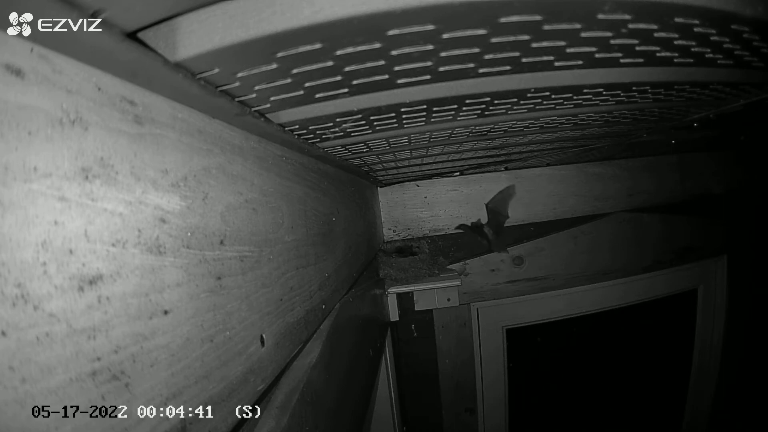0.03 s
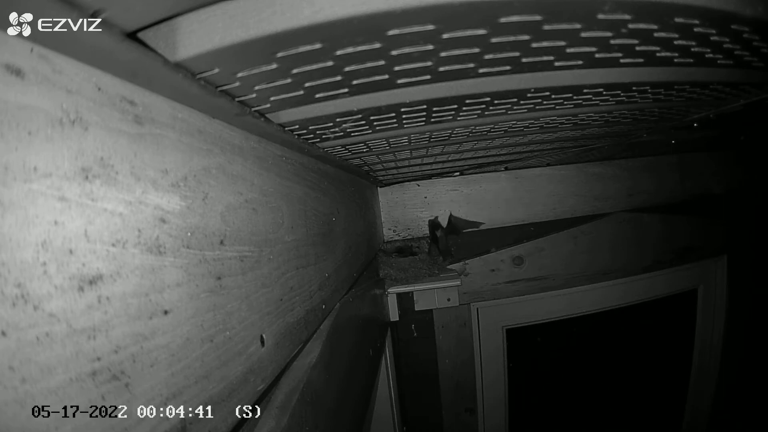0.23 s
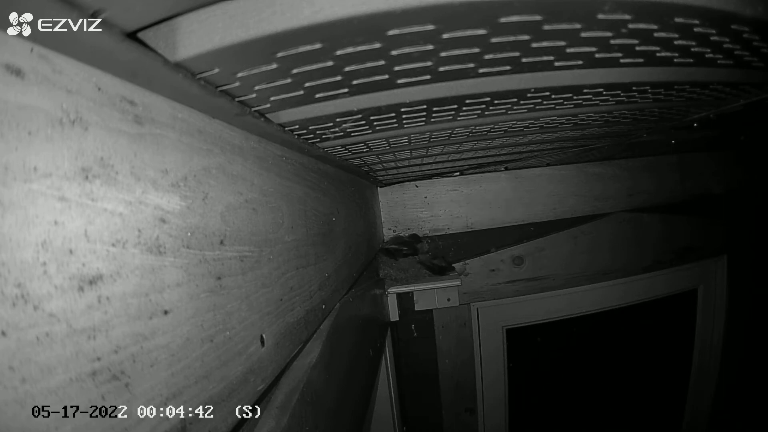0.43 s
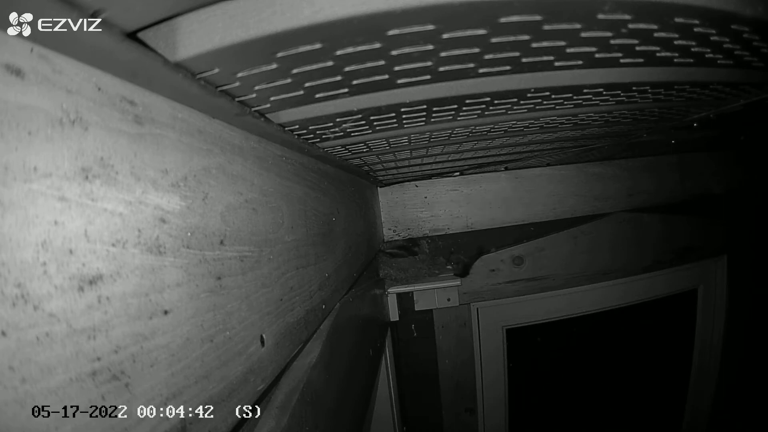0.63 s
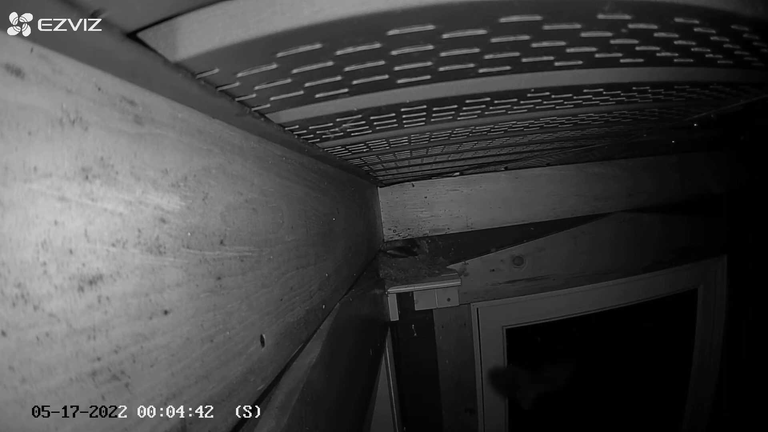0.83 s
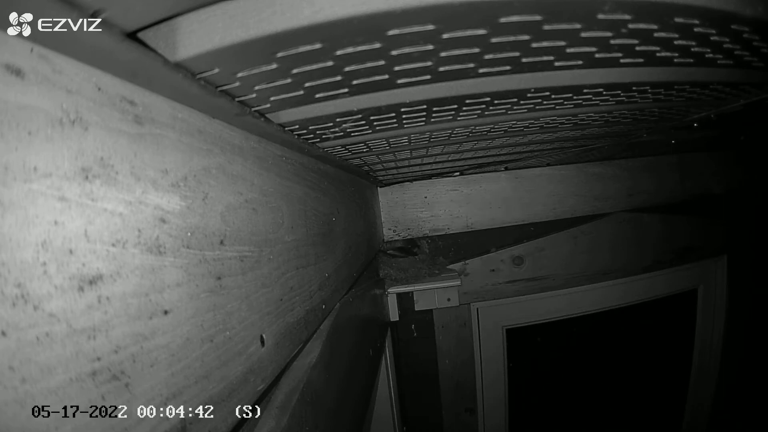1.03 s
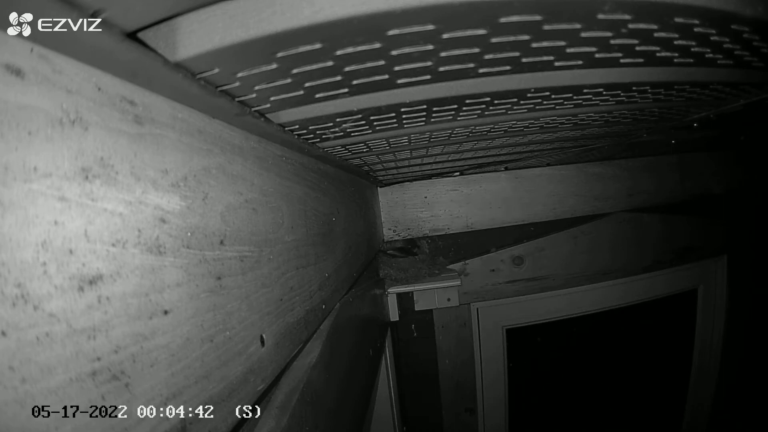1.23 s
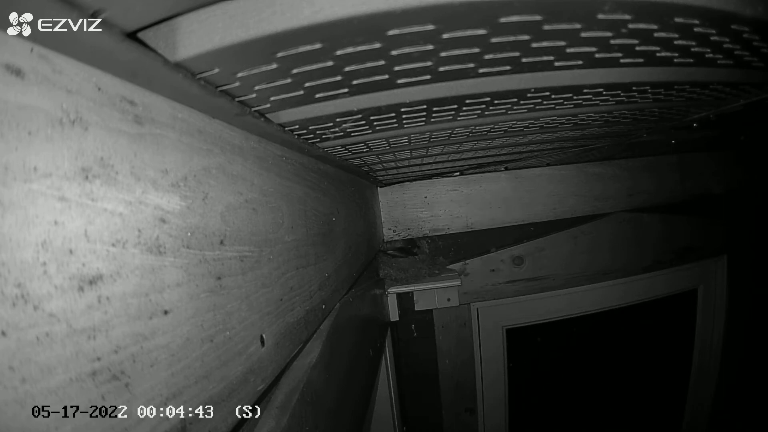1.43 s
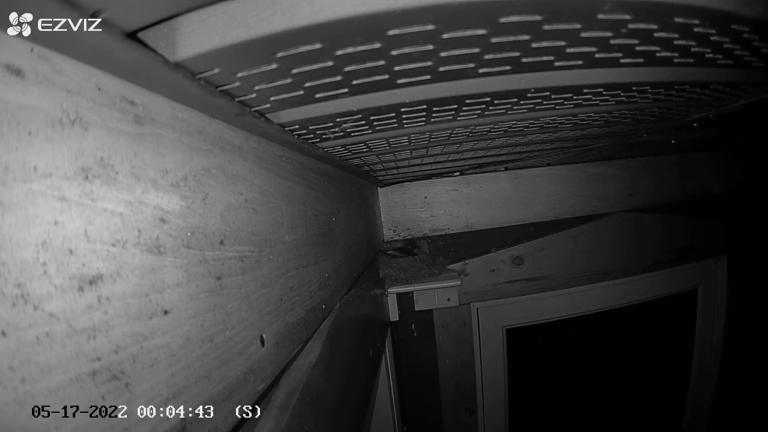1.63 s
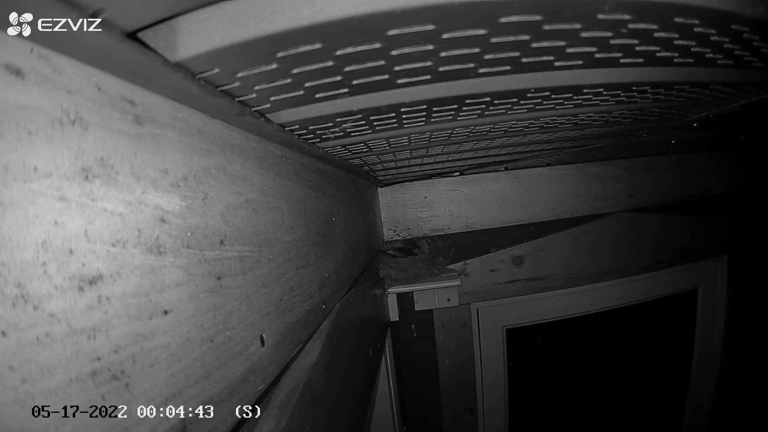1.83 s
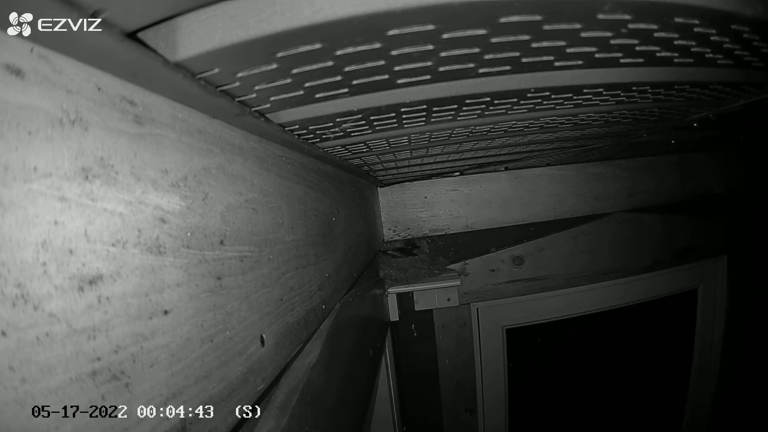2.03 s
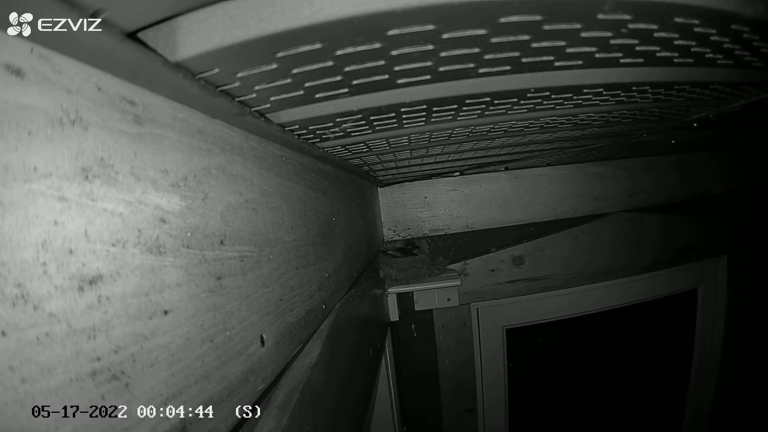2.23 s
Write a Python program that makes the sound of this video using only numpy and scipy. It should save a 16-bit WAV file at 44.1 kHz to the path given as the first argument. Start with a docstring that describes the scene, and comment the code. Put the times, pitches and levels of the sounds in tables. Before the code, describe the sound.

Dull, irregular wing flaps of a small bat lightly brushing and ticking against a wooden wall.

```python
"""Wings in a wooden corner

A small animal flutters close by at night. Its wings displace air in uneven flurries of dull puffs,
over a low stir of eddies. Friction sounds as it brushes and scratches the wall; impacts give ticks
and light taps. After two seconds it settles, and only a faint low hum and hiss remain."""
import sys
import numpy as np
from scipy import signal
from scipy.fft import rfft, irfft, next_fast_len
from scipy.io import wavfile

SR = 44100
rng = np.random.default_rng(int(sys.argv[2]) if len(sys.argv) > 2 else 0)


def file_out(sig):
    """Save sig as 16-bit WAV at sys.argv[1]."""
    # one column per channel
    cols = np.atleast_2d(sig).T
    # limit, then scale
    lim = np.clip(cols, -1, 1)
    pcm = np.round(lim * 32767).astype(np.int16)
    wavfile.write(sys.argv[1], SR, pcm)


N = 101429
T = np.arange(N) / SR

# Spectra of the noises. Each row: frequency in Hz, relative level in dB.
NIGHT_SPECTRUM = [(25, 1), (170, -1), (350, -13), (600, -16), (1000, -19), (2000, -21.5), (7000, -29.5)]
EDDY_SPECTRUM = [(30, -24), (60, -12.5), (110, 7), (180, 3), (260, 3), (350, -16), (450, -44), (700, -71)]
RUSTLE_SPECTRUM = [(180, -11), (300, 7.5), (420, 1.5), (560, -15.5), (750, -22.5), (1000, -39),
                   (1450, -48.5), (1900, -72.5)]
DRAUGHT_SPECTRUM = [(15, -11), (30, -11.5), (50, -0.5), (75, -2), (110, 0), (200, -31.5), (500, -85)]
WAKE_SPECTRUM = [(150, -17.5), (280, 6.5), (380, 7), (500, -11.5), (650, -25.5), (850, -45), (1300, -81.5)]
HISS_SPECTRUM = [(700, 7), (1400, -1.5), (2300, -11), (3600, -1.5), (5200, 2), (6400, 0), (7200, -20.5),
                 (7800, -39.5)]
CRACK_SPECTRUM = [(400, -22.5), (800, -5.5), (1400, -7), (2100, -16), (3000, -4), (3900, 4), (5200, 7),
                  (6200, 0.5), (7000, -22), (8300, -38.5)]
TAP_SPECTRUM = [(600, -0.5), (1100, 12), (2200, -5.5), (2700, -19.5), (4200, -29), (5200, -6), (6200, -11),
                (7000, -31.5)]

# Envelopes of the sustained noises. Each row: time in seconds, relative level in dB.
EDDY_LEVELS = [(0, -54.5), (.1, -48), (.3, -37), (.5, -36.5), (.7, -46.5), (.78, -45.5), (.9, -38),
               (.975, -41), (1.1, -39.5), (1.22, -36.5), (1.4, -43.5), (1.52, -43), (1.58, -56.5),
               (1.68, -55.5), (1.8, -37), (1.92, -44), (1.97, -57), (2.07, -68), (2.11, -95), (2.3, -103)]
RUSTLE_LEVELS = [(0, -100.5), (.14, -89), (.21, -71), (.28, -53), (.41, -47.5), (.47, -43), (.58, -54.5),
                 (.7, -42.5), (.84, -46), (.975, -48.5), (1.05, -33), (1.16, -57.5), (1.28, -52.5),
                 (1.52, -46.5), (1.58, -62.5), (1.72, -59.5), (1.9, -60.5), (2.0, -66), (2.1, -96.5)]
DRAUGHT_LEVELS = [(0.0, -39.5), (0.15, -35.5), (0.18, -46.5), (0.45, -36.5), (0.47, -49), (0.68, -36.5),
                  (0.86, -56), (0.9, -34), (0.975, -61), (1.015, -31), (1.12, -46), (1.2, -30), (1.64, -67),
                  (1.71, -53), (1.75, -41), (1.82, -36.5), (2.09, -84.5), (2.3, -85)]
HISS_LEVELS = [(.38, -130), (.412, -64), (.465, -57), (.49, -50), (.525, -62), (.545, -53), (.585, -69),
               (.635, -69), (.68, -130)]

# Puffs of air. Each row: time in seconds, envelope peak in dB, pitch in Hz, bandwidth in octaves.
WING_FLAPS = [(0.0395, -27.5, 156.3, 0.49), (0.0478, -30, 181.6, 0.36), (0.073, -33.5, 173, 0.38),
              (0.1242, -29, 146.8, 0.15), (0.1391, -26.5, 92.2, 0.4), (0.168, -20.5, 128.4, 0.4),
              (0.2076, -22.5, 152.6, 0.46), (0.2115, -21.5, 237, 0.27), (0.226, -26.5, 96, 0.91),
              (0.2609, -23, 156.8, 0.26), (0.265, -18.5, 140, 0.56), (0.277, -19.5, 139, 0.33),
              (0.2961, -25.5, 124.5, 0.3), (0.3135, -20, 223, 0.27), (0.3342, -7.5, 176.7, 0.66),
              (0.3539, -15, 183.4, 0.4), (0.3667, -8.5, 163.4, 0.72), (0.3951, -27.5, 107, 0.19),
              (0.4071, -31, 161, 0.2), (0.4306, -9, 184.4, 0.37), (0.4425, -15.5, 170, 0.74),
              (0.45, -13.5, 218, 0.53), (0.459, -25, 145, 0.86), (0.4981, -28, 205, 0.21),
              (0.5122, -24, 138, 0.7), (0.523, -25, 175, 0.27), (0.5385, -24, 157, 0.82),
              (0.5633, -26, 152, 0.48), (0.5752, -16.5, 213, 0.37), (0.5903, -27.5, 161, 0.68),
              (0.6162, -14, 229, 0.5), (0.638, -27, 132, 0.73), (0.6532, -16, 169.5, 0.58),
              (0.6687, -20.5, 153, 0.42), (0.6832, -22, 104.2, 1.1), (0.6911, -24.5, 185, 0.41),
              (0.7003, -19.0, 152, 0.56), (0.71, -21, 183.6, 0.38), (0.7174, -22, 110, 1.03),
              (0.7319, -13.5, 217, 0.75), (0.743, -30.5, 141.3, 0.16), (0.7625, -13.5, 144.7, 0.98),
              (0.8072, -13, 211.7, 0.42), (0.8231, -15, 241, 0.89), (0.83, -21.5, 148.5, 0.27),
              (0.8504, -14.5, 146.4, 0.62), (0.8684, -11, 236.4, 0.34), (0.8783, -13, 159.3, 0.9),
              (0.889, -23.5, 122, 0.4), (0.8992, -28, 287, 0.17), (0.911, -11.5, 168, 0.6),
              (0.9205, -14, 207, 0.61), (0.9284, -16.5, 225, 0.3), (0.9397, -23, 154, 0.29),
              (0.9515, -19.5, 209, 0.46), (0.9921, -20.5, 185.4, 0.28), (1.0182, -12, 309, 0.51),
              (1.0257, -10, 161, 0.76), (1.0513, -18.5, 186, 0.62), (1.0697, -11.5, 227.3, 0.59),
              (1.08, -21.5, 137, 0.21), (1.1429, -21.5, 141.5, 0.93), (1.1648, -26, 135, 0.21),
              (1.177, -16, 238, 0.23), (1.1843, -21, 163, 0.31), (1.1989, -8.5, 174, 0.65),
              (1.2105, -7, 169.3, 0.71), (1.2216, -9.5, 220.3, 0.2), (1.255, -10.5, 181.6, 0.54),
              (1.2791, -23, 157, 0.11), (1.2966, -13.0, 255, 0.6), (1.303, -21, 120, 1.02),
              (1.3118, -14.5, 208, 0.59), (1.3252, -23.5, 290, 0.288), (1.3397, -27, 191, 0.95),
              (1.3585, -17.5, 130.3, 0.59), (1.3675, -16.5, 193, 0.72), (1.3899, -11, 195.6, 0.67),
              (1.4032, -16.0, 147, 0.68), (1.43, -21, 238.5, 0.31), (1.4602, -14.5, 173.7, 1.04),
              (1.472, -16, 208.4, 0.4), (1.4881, -13.5, 168.7, 0.72), (1.4972, -21.5, 245, 0.38),
              (1.5069, -18, 154.4, 0.46), (1.518, -16, 150.7, 0.69), (1.5732, -26, 148, 0.69),
              (1.6277, -29, 174, 0.19), (1.6304, -30, 297.3, 0.27), (1.6431, -21.0, 156, 0.65),
              (1.6548, -25, 234.6, 0.36), (1.7001, -23.5, 141, 0.36), (1.7117, -21.5, 132, 0.83),
              (1.7261, -30.5, 259.5, 0.38), (1.7561, -23, 258, 0.44), (1.7627, -26, 139.7, 0.45),
              (1.7898, -24.0, 237, 0.29), (1.8263, -19, 160.7, 0.59), (1.8402, -13.0, 262.6, 0.32),
              (1.8741, -24.5, 211, 0.5), (1.886, -17.5, 201, 0.53), (1.9088, -17, 187, 0.61),
              (1.9253, -21.5, 166.3, 0.46), (1.9817, -29.0, 199.6, 0.39)]
# Claws sliding on wood.
# Each row: time in seconds, level in dB, half-width in seconds, centre in Hz, bandwidth in octaves.
CLAW_SCRATCHES = [(.33, -67.5, .04, 863.4, .15), (.358, -77.5, 0.02, 5880, .06),
                  (0.547, -51, .008, 5560, 0.15), (0.735, -61.5, .008, 1400, 0.3),
                  (0.843, -66, .022, 5780, 0.13), (0.848, -62, .022, 1296, .35),
                  (0.909, -71, 0.14, 1154, 0.23), (1.001, -49, 0.0056, 1110, 0.2),
                  (1.01, -62, .005, 1247, 0.16), (1, -84.5, 0.006, 5660, 0.076)]
# Wings on wood. Each row: time in seconds, level in dB, half-width in seconds, upper edge in Hz.
WING_BRUSHES = [(0.448, -43, 0.0024, 620), (0.46, -50, 0.0021, 619), (0.495, -41, 0.0023, 679),
                (0.729, -36.5, 0.003, 745), (0.735, -44.5, 0.0033, 793), (0.785, -55, 0.01, 880),
                (0.81, -38, 0.0046, 790), (0.82, -40, .004, 650), (0.864, -31, 0.003, 607),
                (1.022, -39.5, 0.0047, 544), (1.085, -55, .004, 650), (1.217, -43, 0.0092, 800),
                (1.257, -39.5, 0.0083, 634), (1.319, -35, 0.003, 568), (1.365, -39.5, 0.0038, 688),
                (1.47, -41, 0.0051, 598.4), (1.629, -43.5, 0.0031, 440), (1.767, -52.5, 0.0088, 523),
                (1.912, -52.5, .003, 520)]
# Hard impacts. Each row: start in seconds, crack level in dB, knock drive in dB, crack decay in seconds.
WALL_TICKS = [(0.474, -27, -31.5, 0.00058), (0.5361, -26.5, -32, 0.0015)]
# Modes of the wall. Each row: frequency in Hz, level in dB relative to the drive, decay in seconds.
WOOD_MODES = [(850, -0.5, 0.0013), (1350, -11.5, 0.0021)]
# Light impacts of claws. Each row: time in seconds, level in dB.
CLAW_TAPS = [(0.8366, -43.5), (0.8443, -46.5), (.851, -52.5), (.856, -55.5)]


def from_db(db):
    """Amplitude ratio for a level in decibels."""
    return 10 ** (np.asarray(db) / 20)


def level(curve):
    """Gain over time, interpolated in decibels."""
    return from_db(np.interp(T, *np.transpose(curve)))


def shaped_noise(gain_at):
    """White noise filtered by a function of frequency and scaled to unit rms."""
    size = next_fast_len(N, True)
    hz = np.maximum(np.fft.rfftfreq(size, 1 / SR), 1)
    white = rfft(rng.standard_normal(size))
    shaped = irfft(white * gain_at(hz), size)[:N]
    return shaped / shaped.std()


def noise(spectrum):
    """Noise of unit rms with a tabulated spectrum, interpolated in log frequency."""
    points_hz, db = np.transpose(spectrum)
    return shaped_noise(lambda hz: from_db(np.interp(np.log(hz), np.log(points_hz), db)))


def slope(ratio, order):
    """Gain of a filter edge: flat below a ratio of 1, falling beyond."""
    return 1 / np.sqrt(1 + ratio ** (2 * order))


def band(hz, centre_hz, octaves):
    """Gain of a pass band, bell-shaped in log frequency."""
    return np.exp(-.5 * (np.log2(hz / centre_hz) / octaves) ** 2)


def swell(time, half_width):
    """A smooth envelope, symmetric about its peak at the given time."""
    return 1 / (1 + ((T - time) / half_width) ** 2 / 2) ** 2


def burst(envelope, carrier):
    """Amplitude-modulated noise, scaled to carry the energy of its envelope."""
    pulse = envelope * carrier
    return pulse * np.sqrt(np.sum(envelope ** 2) / np.sum(pulse ** 2))


def night_background():
    """Stationary noise weighted to the bass is heard as a faint hum and hiss."""
    return from_db(-91.5) * noise(NIGHT_SPECTRUM)


def stirred_air(flicker_db=5.5, flicker_hz=35):
    """Turbulence makes eddies and membrane rustle flicker, above the deep draught of the wings."""
    eddies = level(EDDY_LEVELS) * noise(EDDY_SPECTRUM)
    rustle = level(RUSTLE_LEVELS) * noise(RUSTLE_SPECTRUM)
    flicker = from_db(flicker_db * shaped_noise(lambda hz: slope(hz / flicker_hz, order=4)))
    draught = from_db(-5.5) * level(DRAUGHT_LEVELS) * noise(DRAUGHT_SPECTRUM)
    return flicker * (eddies + rustle) + draught


def wing_flaps(top_hz=596, wake_exponent=1.405):
    """A flap displaces air in one smooth push and pull, and sheds a turbulent wake."""
    size = next_fast_len(N + SR // 2)
    hz = np.maximum(np.fft.rfftfreq(size, 1 / SR), 1)
    hz = hz[hz < SR / 20]
    spectrum = np.zeros(len(hz), complex)
    for time, db, pitch_hz, octaves in WING_FLAPS:
        puff = band(hz, pitch_hz, octaves) * slope(hz / top_hz, order=4)  # a wide band is abrupt
        delay = np.exp(-2j * np.pi * hz * time)
        spectrum += from_db(db) * puff / puff.sum() * delay
    puffs = size * np.fft.ifft(spectrum, size)[:N]  # analytic signal: its magnitude is the envelope
    wake_envelope = np.abs(puffs) ** wake_exponent  # the wake grows faster than the flap that sheds it
    return puffs.imag + from_db(-23.5) * wake_envelope * noise(WAKE_SPECTRUM)


def claw_scratches():
    """Friction of claws gives swells of band-limited noise; the narrowest bands squeak."""
    out = np.zeros(N)
    for time, db, half_width, centre_hz, octaves in CLAW_SCRATCHES:
        friction = shaped_noise(lambda hz: band(hz, centre_hz, octaves))
        out += from_db(db) * swell(time, half_width) * friction
    return out


def dry_hiss():
    """Broadband noise rises and falls around the two hard ticks."""
    return level(HISS_LEVELS) * noise(HISS_SPECTRUM)


def wing_brushes(low_hz=377):
    """Sliding friction of a wing on wood gives a brief swell of dull noise."""
    out = np.zeros(N)
    for time, db, half_width, top_hz in WING_BRUSHES:
        friction = shaped_noise(lambda hz: slope(low_hz / hz, order=4) * slope(hz / top_hz, order=8))
        out += from_db(db) * burst(swell(time, half_width), friction)
    return out


def wall_ticks(reverb_db=-20.5, reverb_decay_s=0.023):
    """An impact cracks brightly, excites damped modes of the wood and reverberates in the corner."""
    out = np.zeros(N)
    crack, reverb = noise(CRACK_SPECTRUM), noise(CRACK_SPECTRUM)
    for start, crack_db, knock_db, crack_decay in WALL_TICKS:
        age = np.maximum(T - start, 0)
        strength = from_db(crack_db) * (T >= start)
        out += burst(strength * np.exp(-age / crack_decay), crack)
        out += from_db(reverb_db) * strength * np.exp(-age / reverb_decay_s) * reverb
        for hz, mode_db, decay in WOOD_MODES:
            out += from_db(knock_db + mode_db) * np.exp(-age / decay) * np.sin(2 * np.pi * hz * age)
    return out


def claw_taps(half_width_s=0.0008):
    """The brief contact of a claw with wood radiates a tiny, dry click."""
    click = noise(TAP_SPECTRUM)
    return sum(from_db(db) * burst(swell(time, half_width_s), click) for time, db in CLAW_TAPS)


def scene():
    """The animal's sounds add to the background by superposition, in one channel."""
    wings = wing_flaps() + wing_brushes()
    wall = dry_hiss() + claw_scratches() + wall_ticks() + claw_taps()
    return (wings + wall + stirred_air() + night_background())[None]


def record(dry):
    """A steep low-pass filter removes the highest treble."""
    stop_db, stop_hz = 70, 8300
    return signal.sosfilt(signal.cheby2(14, stop_db, stop_hz, fs=SR, output="sos"), dry)


dry = scene()
out = record(dry)
file_out(out)
```